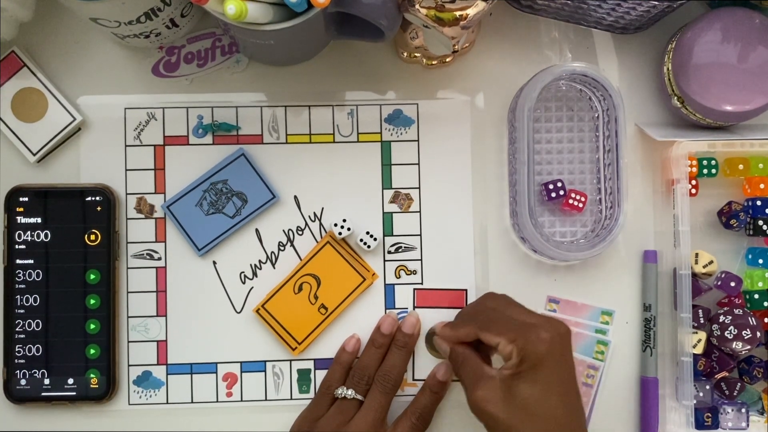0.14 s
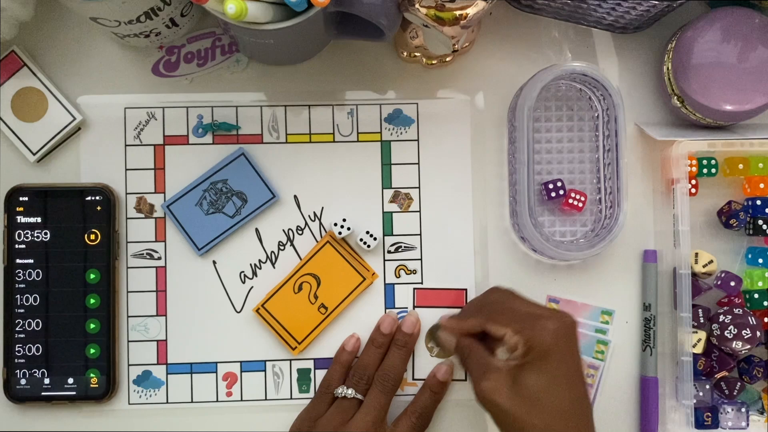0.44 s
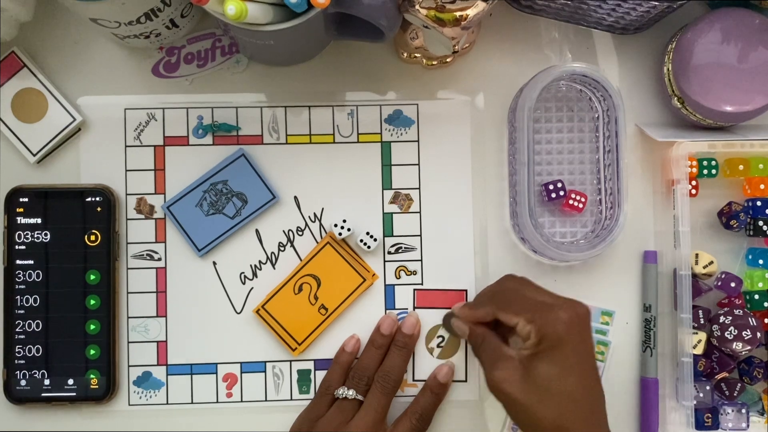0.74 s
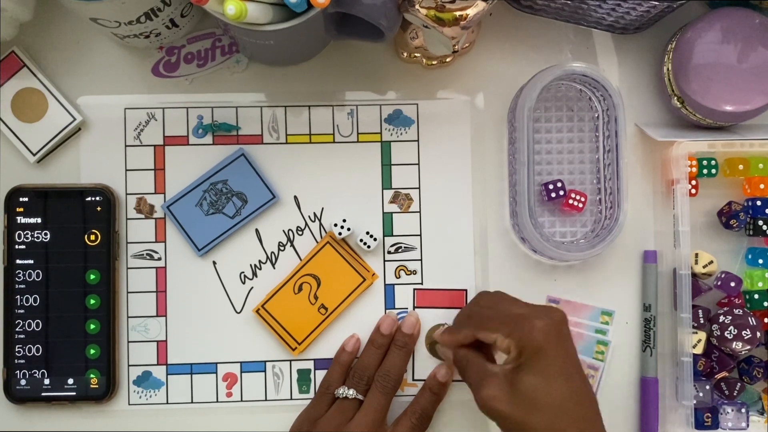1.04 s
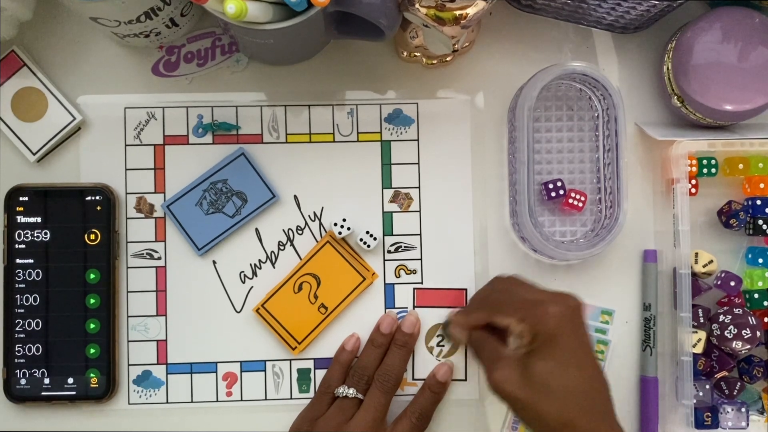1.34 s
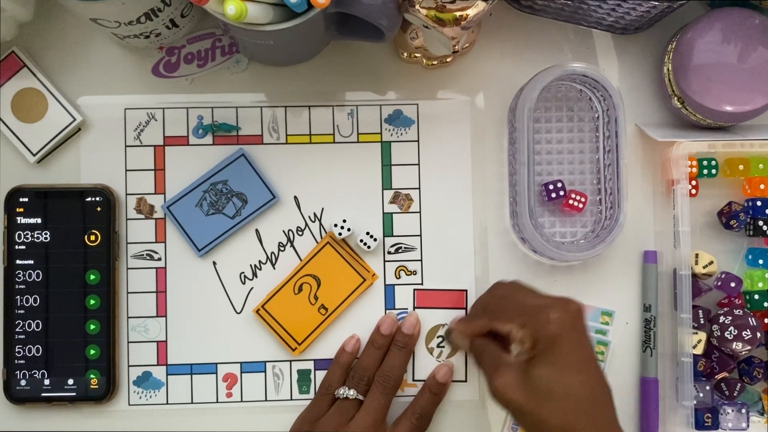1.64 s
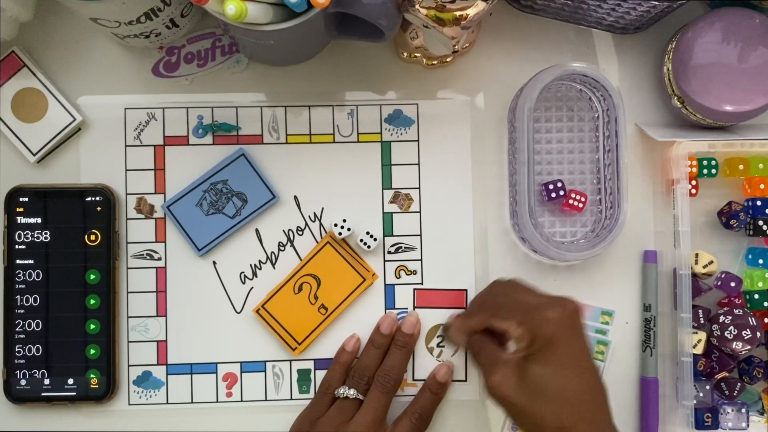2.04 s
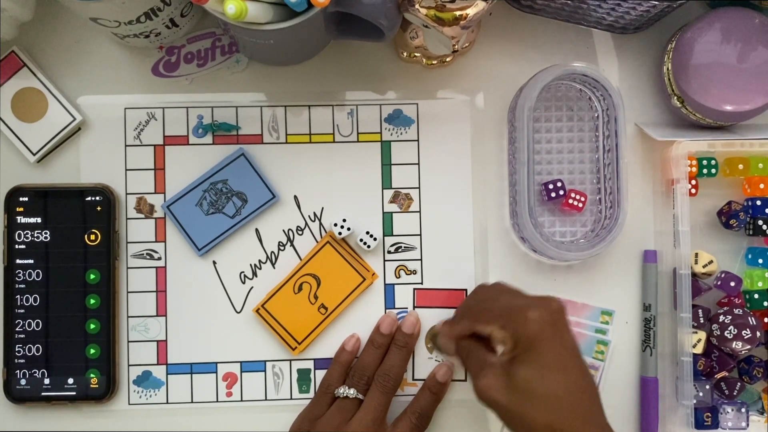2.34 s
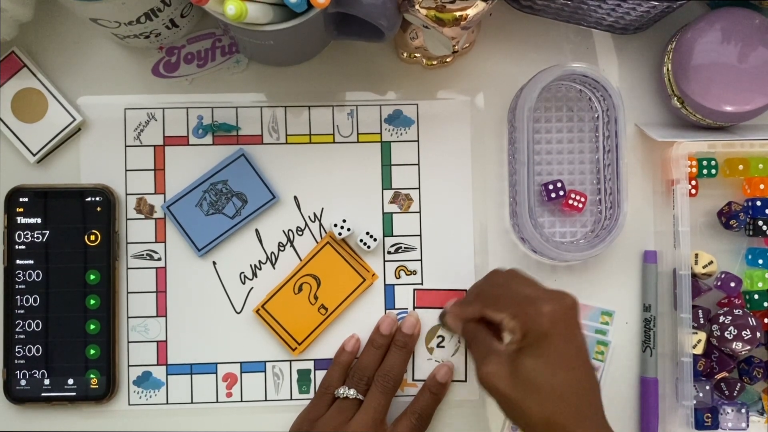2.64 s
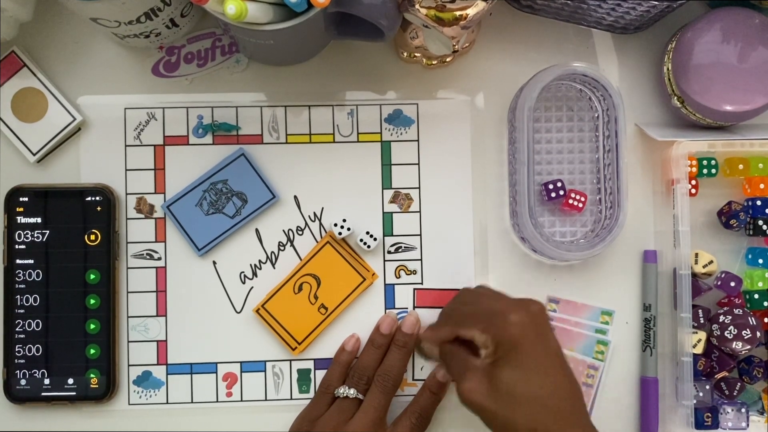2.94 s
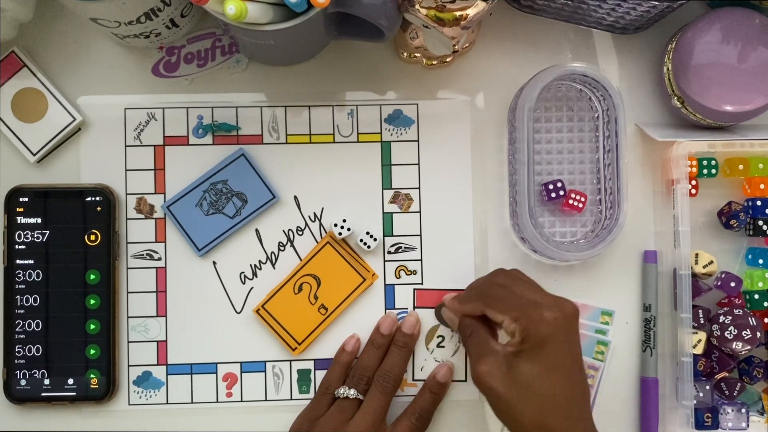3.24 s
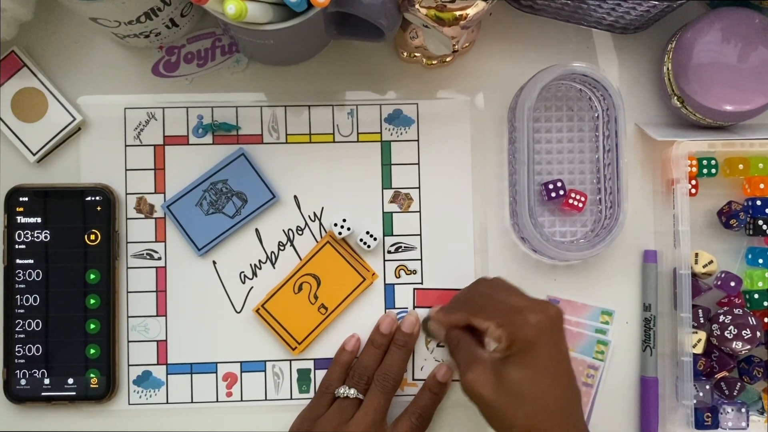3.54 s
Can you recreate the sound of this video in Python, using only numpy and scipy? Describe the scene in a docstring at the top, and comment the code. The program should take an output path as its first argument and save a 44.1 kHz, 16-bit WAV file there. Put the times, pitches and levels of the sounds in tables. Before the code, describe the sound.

A coin scrapes a paper card on a table in fast, short back-and-forth strokes, faint and gritty, joined by uneven rim knocks that sharpen midway; quiet room with low hum, close stereo microphone.

```python
"""Under a phone, a quiet room opens: shaped noise, with a low wavering hum from a narrow noise band.
A coin then scrapes the coating off a paper card on a table in quick back-and-forth strokes: noise
hisses as grit, while dense clicks ring the card and the table top. Soon the rim catches or knocks now
and then, short bursts into the same bodies; later some hard catches crack off flakes, tiny bright bursts.
A short room tail trails the scrapes and knocks; two microphone ports hear the coin a little apart."""
import sys
import numpy as np
from scipy import signal
from scipy.fft import rfft, irfft
from scipy.io import wavfile
from scipy.ndimage import uniform_filter1d

SR = 44100
rng = np.random.default_rng(int(sys.argv[2]) if len(sys.argv) > 2 else 0)


def digitize_waveform(pressure):
    """Quantize a signal to 16-bit integers and store it at the path in sys.argv[1].

    Rows of a 2-D input are taken as channels; values are limited to [-1, 1].
    """
    field = np.atleast_2d(pressure).T
    bounded = np.clip(field, -1, 1)
    quanta = np.round(bounded * 32767).astype(np.int16)
    wavfile.write(sys.argv[1], SR, quanta)


N = 163170

# room air spectrum: hz, relative_db (per Hz)
AIR_SPECTRUM = [(30, -11), (50, -6), (80, 9.5), (330, -7.5), (600, -14), (1300, -30), (4500, -39.5),
                (9700, -36.5), (15800, -59)]
# phase by which the left port leads the right: hz, lead_rad
PORT_LEAD = [(0, 0), (4300, .9), (5000, .3), (7200, 3.14), (10600, 6.28), (13500, 9.42), (16000, 12.3)]
# level of the left port over the right: hz, tilt_db
PORT_TILT = [(60, -0.5), (430, -3.5), (900, -1.5), (1500, 4.5), (2300, -2), (5500, -0.5)]
# scraping strokes: start_s, length_s, grit_db, swell_db (rise over the stroke), card_db, table_db
STROKES = [(0.025, 0.077, -68, 12, -68.5, -62.5), (0.139, 0.068, -65, 0.5, -60.5, -50.5),
           (0.251, 0.078, -71, 8.5, -67, -60.5), (0.361, 0.08, -65, -4.5, -59, -54),
           (0.48, 0.069, -69.5, -8.5, -69, -59), (0.597, 0.07, -64, 3.5, -56.5, -52),
           (0.699, 0.084, -65.5, 3, -67.5, -56), (0.815, 0.07, -68, -1.5, -62, -54),
           (0.939, 0.055, -64.5, 14, -61, -60.5), (1.033, 0.082, -62.5, 4.5, -58.5, -55.5),
           (1.153, 0.067, -60, 0.5, -65.5, -63), (1.257, 0.066, -63, 4, -61.5, -52),
           (1.352, 0.1, -67, 1.5, -61, -64), (1.474, 0.079, -64.5, 2, -60, -52.5),
           (1.586, 0.067, -64.5, 3.5, -71.5, -59), (1.688, 0.069, -65.5, 9, -56, -53),
           (1.797, 0.06, -62, -6.5, -63, -60), (1.899, 0.061, -65.5, 9, -56.5, -52.5),
           (1.99, 0.067, -66, -2.5, -65.5, -61), (2.085, 0.074, -65.5, 10, -61, -50.5),
           (2.185, 0.072, -64.5, -1.5, -69, -55.5), (2.295, 0.063, -66, 17.5, -57, -48),
           (2.378, 0.095, -67.5, 9, -72, -67), (2.492, 0.089, -66, 4, -60, -54),
           (2.595, 0.077, -67, 8, -61, -59), (2.704, 0.077, -67.5, 11.5, -59.5, -49),
           (2.819, 0.057, -69, -16, -62, -71), (2.923, 0.057, -66, 3, -56.5, -44.5),
           (3.016, 0.063, -64.5, 10, -57.5, -57.5), (3.119, 0.065, -67.5, 2.5, -64, -52.5),
           (3.229, 0.05, -62, -2, -63, -63), (3.325, 0.047, -67.5, 10, -62, -53),
           (3.422, 0.052, -65.5, -2, -67, -65.5), (3.504, 0.056, -64.5, 5.5, -62, -48),
           (3.602, 0.056, -67, 8, -67.5, -79)]
# grit hiss spectrum: hz, relative_db (per Hz)
GRIT_SPECTRUM = [(1000, -1.5), (2500, 0), (3500, 4.5), (4000, -6.5), (4600, 5.5), (5300, -6), (6800, -0.5),
                 (7800, -13), (9700, 4), (10500, -8.5), (13000, -12), (15000, -13), (15700, -7),
                 (16300, -66)]
# ringing modes of the card on the table: pitch_hz, level_db (relative), t60_s
CARD_MODES = [(696, 1.5, 0.024), (887, 0.5, 0.037), (1033, 5, 0.012), (1222, -2, 0.025), (1477, 0.5, 0.023),
              (1758, 3, 0.013), (2272, -6.5, 0.041), (2990, 2, 0.005)]
# ringing modes of the table top: pitch_hz, level_db (relative), t60_s
TABLE_MODES = [(121, -7.5, 0.1), (176.3, -6, 0.28), (243.4, 2.5, 0.078), (324.8, -1.5, 0.22),
               (430.8, 1.5, 0.12), (623.4, -1, 0.04)]
# catches and knocks of the rim: start_s, card_peak_db, table_peak_db,
# card_hardness_db (per octave), table_lightness_db (per octave)
KNOCKS = [(0.133, -38.5, -41.5, -7, -3), (0.199, -46.5, -43.5, 7, 3), (0.416, -47, -39, 23, 1),
          (0.437, -41, -38, -17, -4.5), (0.645, -27, -29.5, -5.5, 8.5), (0.652, -27.5, -31, -0.5, -2),
          (0.71, -43.5, -32, 4.5, 7.5), (0.774, -41.5, -61, 6, -4), (1.086, -48, -36, 16, 0),
          (1.106, -34, -33, 1.5, -9), (1.313, -32, -30, 4, -2), (1.434, -32.5, -39.5, 0.5, -4),
          (1.476, -44, -40, -5.5, 16), (1.942, -49, -39, 1, 2.5), (2.038, -44.5, -47, -2, 0),
          (2.047, -39, -39.5, 4, 13), (2.146, -28.5, -29.5, 4, 8), (2.185, -42.5, -38, 9, 0.5),
          (2.344, -18, -25.5, 2.5, 9.5), (2.389, -41, -34, 3, 5), (2.454, -32.5, -40.5, 10.5, 10),
          (2.556, -16, -30, 1.5, 8), (2.595, -41.5, -33, 6, 7.5), (2.764, -45.5, -33.5, 10, 6.5),
          (2.828, -41.5, -35, 5.5, 6), (2.964, -38.5, -33, 4.5, -1.5), (3.034, -38, -43, 2, 5),
          (3.28, -45, -44.5, -2, 16), (3.469, -41.5, -44, -4.5, 11), (3.508, -34.5, -38, -10.5, 2),
          (3.554, -47, -46, -5, -16)]
# cracking flakes of coating: start_s, peak_db
FLAKES = [(0.645, -42), (1.314, -45), (2.148, -39), (2.345, -38.5), (2.454, -42), (2.554, -38)]
# decay of the room tail: hz, t60_s
ROOM_T60 = [(500, 0.36), (3000, 0.06)]

AIR_DB, AIR_APART_DB, AIR_SAME_HZ = -58.5, -5.5, 525  # well below the last, both ports hear alike
HUM_HZ, HUM_HALF_WIDTH_HZ, HUM_DB = 58.56, 0.92, -57.5
RISE_S, FALL_S = 0.01, 0.01
GRIT_DRIFT_DB, CARD_DRIFT_DB, FLICKER_DB = 3, 2, 2
SLIPS_PER_S, SLIP_SPREAD_DB = 3000, 4  # clicks that drive the card
JOLTS_PER_S, JOLT_SPREAD_DB = 270, 1  # clicks that drive the table
CARD_LOW_HZ, DAMPED_S = 306, 0.025
SNAP_S, SNAP_ROUGH, THUD_S = 0.0012, 1.56, 0.0015
DRAG_PER_DB, HARD_DB = 0.65, -23.5  # a catch at HARD_DB drags for just SNAP_S
RATTLE, RATTLE_S = 1, 0.0044
FLAKE_S, FLAKE_BRIGHT = 0.0013, 0.26
ROOM_DB, ROOM_LOW_HZ = -11.5, 267
EDGE_HZ = 16500


def amp(db):
    """Decibels to linear gain."""
    return 10 ** (np.asarray(db) / 20)


def evened(x):
    """Scale to an RMS of one."""
    return x / np.sqrt(np.mean(x ** 2) + 1e-20)


def unit(x):
    """Scale to unit energy."""
    return x / np.linalg.norm(x)


def read(points, hz):
    """Read a curve between its points along a logarithmic frequency axis."""
    f, value = np.transpose(points)
    return np.interp(np.log(hz + 1), np.log(f + 1), value)


def air():
    """Steady room noise that reaches both ports nearly alike, and a low hum that wavers."""
    hz = np.fft.rfftfreq(N, 1 / SR)
    shared, apart, hum = rfft(rng.standard_normal((3, N)))
    apart = apart * hz / (hz + AIR_SAME_HZ)
    shared, apart = irfft(amp(read(AIR_SPECTRUM, hz)) * np.array([shared, apart]), N)
    noise = ports(shared) + amp(AIR_APART_DB) * apart * [[1], [-1]]
    resonance = 1 / (1 + ((hz - HUM_HZ) / HUM_HALF_WIDTH_HZ) ** 2)
    band = signal.hilbert(irfft(hum * resonance, N))
    hum = (band / abs(band) ** 0.15).real  # slightly evens out the wavering
    return amp(AIR_DB) * evened(noise) + amp(HUM_DB) * evened(hum)


def ports(x):
    """Two microphone ports: a phase lead and a level tilt between them, split half each way."""
    hz = np.fft.rfftfreq(N, 1 / SR)
    lead = np.exp(.5j * np.interp(hz, *np.transpose(PORT_LEAD)))
    left = lead * amp(.5 * read(PORT_TILT, hz))
    return irfft(rfft(x) * np.array([left, 1 / left]), N)


def coin():
    """Strokes and knocks drive the grit hiss, the card and the table top."""
    coating = evened(uniform_filter1d(rng.standard_normal(N), size=300))  # uneven coating
    grit = drifting(rng.standard_normal(N), GRIT_DRIFT_DB) * amp(FLICKER_DB * coating)
    slips = drifting(clicks(SLIPS_PER_S, SLIP_SPREAD_DB), CARD_DRIFT_DB)
    jolts = clicks(JOLTS_PER_S, JOLT_SPREAD_DB)

    low_cut = signal.butter(2, CARD_LOW_HZ, "high", fs=SR, output="sos")
    hiss = unit(colour(GRIT_SPECTRUM))
    card = unit(signal.sosfilt(low_cut, ring(CARD_MODES)))
    table = unit(ring(TABLE_MODES))
    # the pressing hand damps a knock
    damped = [body * np.exp(-np.arange(len(body)) / SR / DAMPED_S) for body in (card, table)]

    drives = [*(strokes() * [grit, slips, jolts]), *knocks(damped)]
    bodies = [hiss, card, table, *damped]
    return sum(signal.oaconvolve(x, body)[:N] for x, body in zip(drives, bodies))


def strokes():
    """Pressure of the rim over time for grit, card and table: smooth rise, a swell, smooth fall."""
    t, pressure = np.arange(N) / SR, np.zeros((3, N))
    for start, length, grit_db, swell_db, card_db, table_db in STROKES:
        on = (1 + np.tanh((t - start) / RISE_S)) / 2
        off = (1 - np.tanh((t - start - length) / FALL_S)) / 2
        place = np.clip((t - start) / length - .5, -.5, .5)
        levels = amp([[grit_db], [card_db], [table_db]])
        pressure += levels * on * off * amp(swell_db * place)
    return pressure


def drifting(x, drift_db):
    """The colour wanders in patches as the rim changes speed and angle."""
    z = signal.stft(x, nperseg=256, noverlap=192)[2]
    patches = uniform_filter1d(rng.standard_normal(z.shape), size=7, axis=0)
    patches = uniform_filter1d(patches, size=40, axis=1)
    return signal.istft(z * amp(drift_db * evened(patches)), nperseg=256, noverlap=192)[1][:N]


def clicks(per_s, spread_db):
    """Dense random clicks of either sign, a few of them large."""
    hit = rng.random(N) < per_s / SR
    size = np.minimum(rng.exponential(1, N), 5)
    sign = rng.choice([-1., 1.], N)
    return evened(hit * sign * amp(spread_db * size))


def colour(points):
    """A causal, minimum-phase filter with the given spectrum."""
    log_gain = np.log(amp(read(points, abs(np.fft.fftfreq(4096, 1 / SR)))))
    return np.fft.ifft(np.exp(np.conj(signal.hilbert(log_gain)))).real[:1024]


def ring(modes):
    """The response to one click: a sum of dying sines of alternating sign."""
    t = np.arange(SR // 4) / SR
    out = np.zeros(len(t))
    for k, (hz, db, t60) in enumerate(modes):
        out += (-1) ** k * amp(db - 60 * t / t60) * np.sin(2 * np.pi * hz * t)
    return out


def knocks(bodies):
    """Each catch of the rim is a rough slap on the card and a blunt, rattling push on the table."""
    t = np.arange(1024) / SR
    out, hz = np.zeros((2, N + len(t))), np.fft.rfftfreq(len(t), 1 / SR)
    card_octaves = np.log2(np.clip(hz, 500, 4000) / 1500)
    table_octaves = np.log2(np.clip(hz, 150, 600) / 320)
    click = signal.unit_impulse(len(t))
    blunt = t * np.exp(-t / THUD_S)
    for start, card_db, table_db, hard_db, light_db in KNOCKS:
        slap_noise, rattle_noise = rng.standard_normal((2, len(t)))
        drag_s = SNAP_S * amp(-DRAG_PER_DB * (card_db - HARD_DB))  # lighter catches drag on longer
        slap = click + SNAP_ROUGH * unit(slap_noise * np.exp(-t / drag_s))
        rattle = click + RATTLE * unit(rattle_noise * np.exp(-t / RATTLE_S))
        thud = np.diff(np.convolve(rattle, blunt)[:len(t)], prepend=0)
        tilts = amp([hard_db * card_octaves, light_db * table_octaves])
        # the short delay leaves room for what the tilt smears ahead of the hit
        pushes = irfft(rfft(np.roll([slap, thud], 40, axis=1)) * tilts) * (t < t[-1] * .75)
        for row, push, db, body in zip(out, pushes, (card_db, table_db), bodies):
            peak = abs(signal.fftconvolve(push, body[:2 * len(t)])).max()
            row[round(start * SR):][:len(t)] += amp(db) * push / peak
    return out[:, :N]


def room(x):
    """A short diffuse tail without bass, different at each port, the treble dying sooner."""
    hz, t, z = signal.stft(rng.standard_normal((2, SR // 2)), SR, nperseg=128)
    decay = amp(-60 * t / read(ROOM_T60, hz)[:, None])
    bass_cut = (hz / (hz + ROOM_LOW_HZ))[:, None] ** 2
    tail = signal.istft(z * decay * bass_cut, SR, nperseg=128)[1]
    tail = tail / np.linalg.norm(tail[0])
    return amp(ROOM_DB) * signal.fftconvolve(x[None], tail, axes=1)[:, :N]


def flakes():
    """On some hard catches a flake of coating cracks off: a short, bright burst of noise."""
    t, out = np.arange(512) / SR, np.zeros(N)
    for start, db in FLAKES:
        burst = signal.lfilter([1, -FLAKE_BRIGHT], [1], rng.standard_normal(len(t)))
        burst = burst * t * np.exp(-t / FLAKE_S)
        out[round(start * SR):][:len(t)] += amp(db) * burst / abs(burst).max()
    return out


def scene():
    """Coin and flakes through the ports, the coin's room tail, and the room air."""
    dry = coin()
    return ports(dry + flakes()) + room(dry) + air()


def record(dry):
    """The band limit of the recorder: a steep low-pass."""
    low_pass = signal.firwin(511, EDGE_HZ, window=("kaiser", 9), fs=SR)
    return signal.oaconvolve(dry, low_pass[None], "same")


dry = scene()
out = record(dry)
digitize_waveform(out)
```